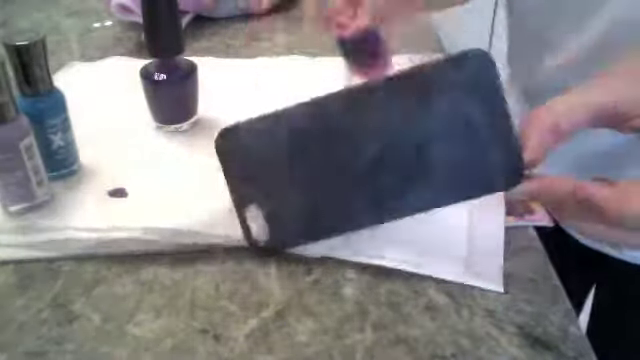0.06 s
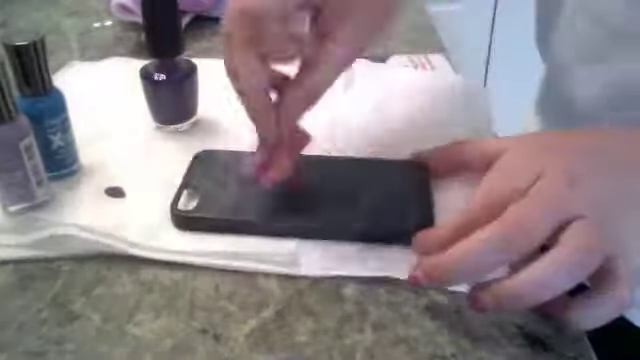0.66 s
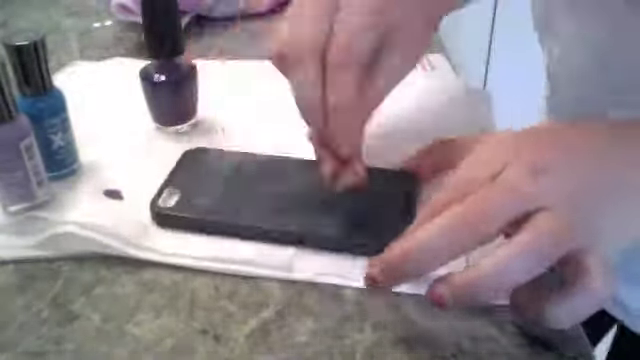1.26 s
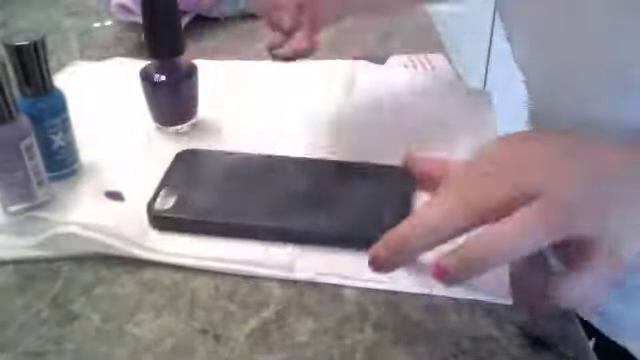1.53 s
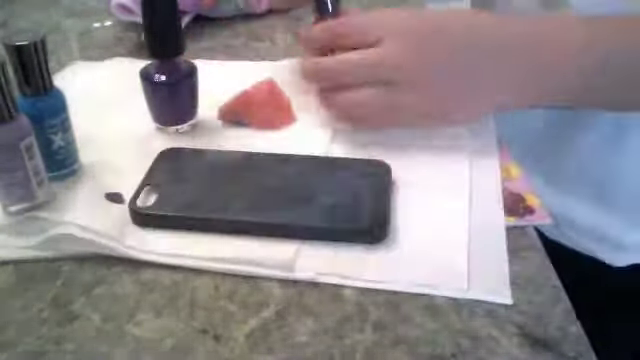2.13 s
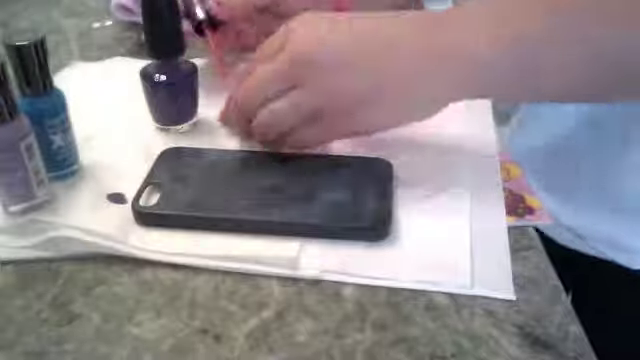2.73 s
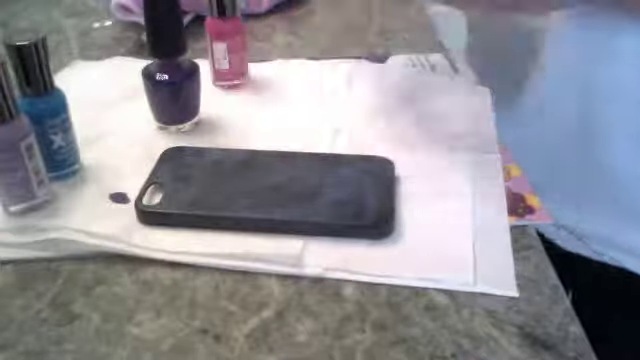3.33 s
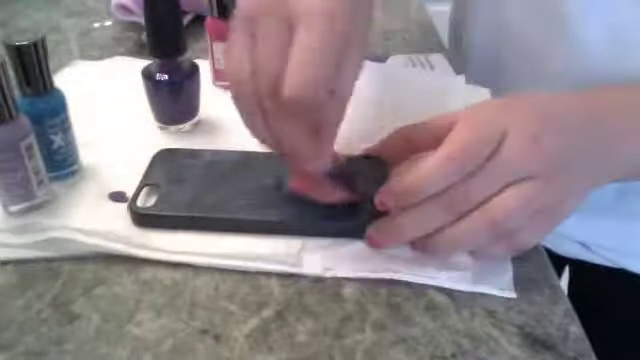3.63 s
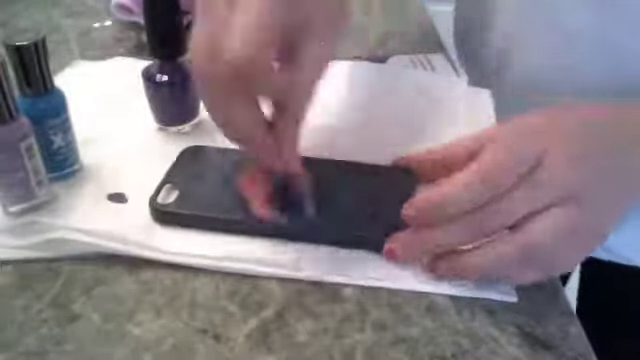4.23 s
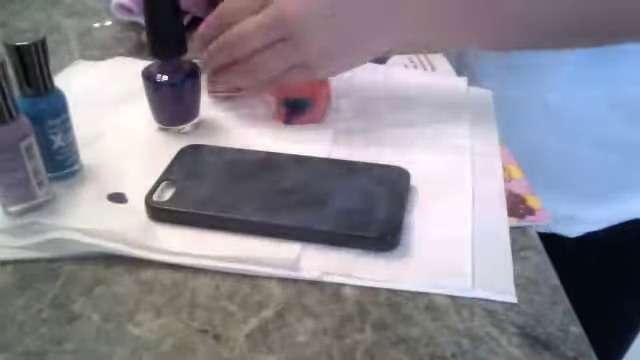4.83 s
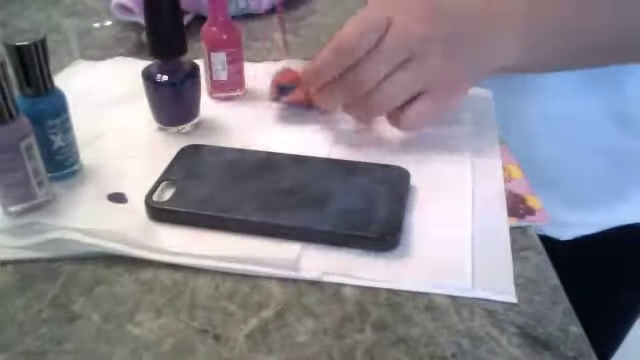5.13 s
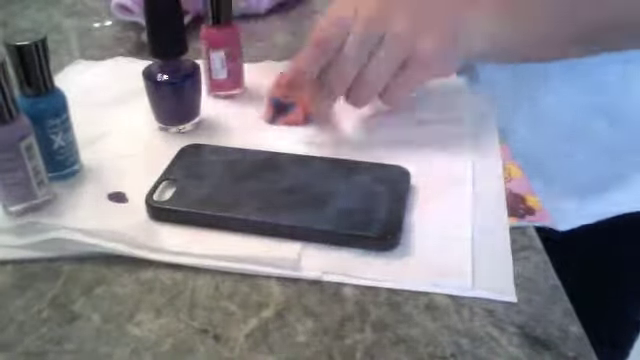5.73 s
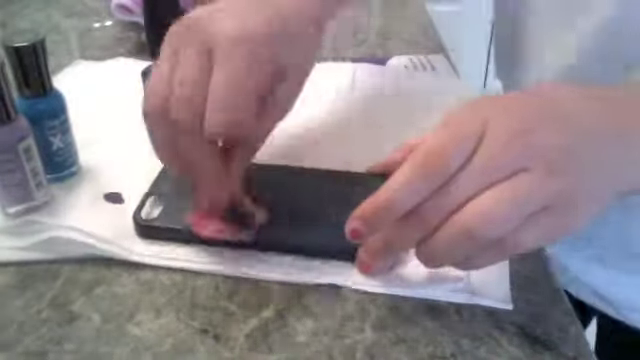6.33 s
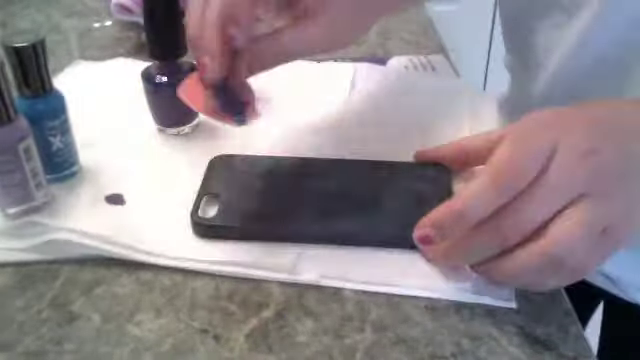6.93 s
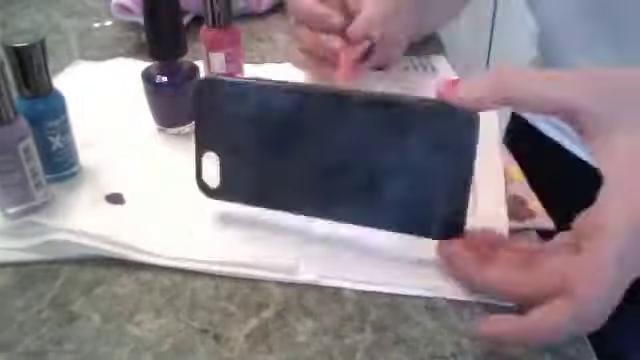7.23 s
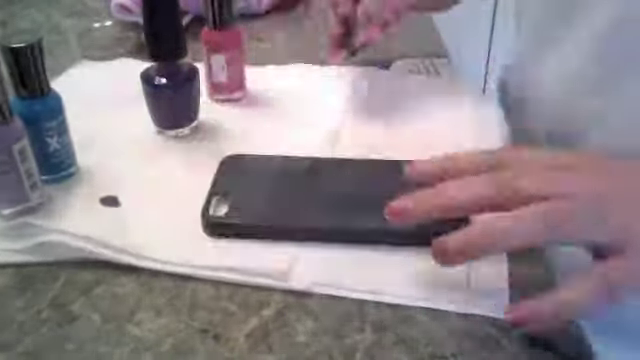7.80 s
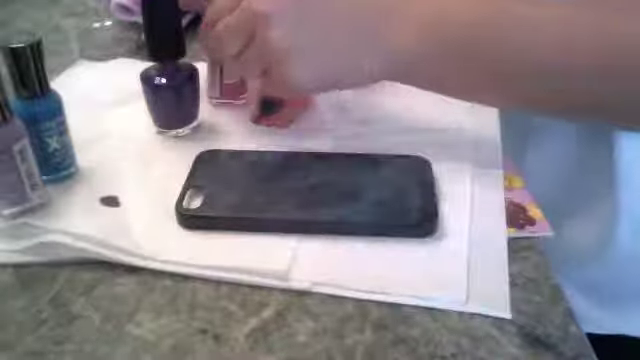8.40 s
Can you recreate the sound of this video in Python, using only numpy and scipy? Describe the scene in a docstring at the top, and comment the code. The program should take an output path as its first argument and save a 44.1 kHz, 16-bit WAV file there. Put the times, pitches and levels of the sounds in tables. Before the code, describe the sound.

A table top is heard from close up, on a small microphone with almost no bass and a hiss that swells and sinks throughout. From about 0.5 to 1.5 seconds a sponge dabs a plastic phone case, with faint tacky pops and light, sharp clicks. From 1.7 to 3 seconds the screw cap of a nail polish bottle is twisted, clicking and giving a run of short, high squeaks as it sticks and slips. Sparse pops, ticks and soft finger bumps follow, with a faint whir in the hiss from about 4 to 5.3 seconds. Near 6 seconds the dabs thicken and the case clicks more loudly as it is pressed and shifted. Its stiff rim takes a few knocks around 6.7 seconds, and the clicks go on until about 7. A few faint ticks and a soft bump come by 8.4 seconds.

```python
"""A table top from close up, on a small microphone with almost no bass and a hiss that swells and sinks.
A paint sponge is dabbed on a plastic phone case lying on paper: tacky pops and light clicks.
From 1.7 to 3 s the screw cap of a nail polish bottle is twisted; it clicks, and squeaks as its thread
sticks and slips. Sparse pops and ticks follow, with a faint whir in the hiss until 5.3 s. Near 6 s the
dabs thicken; the case clicks as it is pressed and shifted, and its stiff rim takes a few knocks."""
import sys
import numpy as np
from scipy import signal
from scipy.fft import rfft, irfft, next_fast_len
from scipy.io import wavfile
from scipy.ndimage import map_coordinates

SR = 44100
rng = np.random.default_rng(int(sys.argv[2]) if len(sys.argv) > 2 else 0)


def unload_wav(signal):
    """Save mono or channel-first audio to the path in sys.argv[1] as 16-bit WAV at rate SR, clipped to [-1, 1]."""
    wavfile.write(
        sys.argv[1],
        SR,
        np.round(np.clip(np.atleast_2d(signal).T, -1, 1) * 32767).astype(np.int16),
    )


N = 372997

# tacky contact, sponge on case or fingers on bottle: (start [s], end [s], level [dB], fizz pitch [Hz])
TACKY_SPELLS = [(0.509, .81, -58, 13000), (0.901, 1.38, -53.5, 12800), (2.275, 2.335, -53.5, 12500),
                (2.639, 2.66, -48.5, 14000), (3.599, 3.909, -62.5, 11930), (4.185, 4.36, -55, 11640),
                (5.901, 6.66, -55.5, 11900)]


def amp(db):
    """Decibels to gain."""
    return 10 ** (np.asarray(db) / 20)


def unit(x):
    """Scale to rms 1."""
    return x / np.sqrt(np.mean(x ** 2) + 1e-20)


def norm(x):
    """Scale to energy 1."""
    return x / np.sqrt(np.sum(x ** 2) + 1e-20)


def wobble(size, rate):
    """A smooth random curve, rate knots a second."""
    return map_coordinates(rng.standard_normal(int(size * rate / SR) + 4), [np.arange(size) * rate / SR])


def along(points, hz):
    """Interpolate (frequency [Hz], value) points on a log frequency axis."""
    freqs, values = np.transpose(points)
    return np.interp(np.log(hz + 1), np.log(freqs), values)


def colour(x, *spectra):
    """Causal filter whose gain is the sum of the spectra, each of (frequency [Hz], gain [dB]) points."""
    size = 2 * next_fast_len(len(x))
    hz = np.fft.rfftfreq(size, 1 / SR)
    gain = amp(sum(along(spectrum, hz) for spectrum in spectra))
    cepstrum = irfft(np.log(gain), size)
    cepstrum[1:size // 2] *= 2  # fold to minimum phase
    cepstrum[size // 2 + 1:] = 0
    return irfft(rfft(x, size) * np.exp(rfft(cepstrum)), size)[:len(x)]


def lowpass(x, hz):
    """A steep band limit."""
    return signal.sosfilt(signal.ellip(12, .1, 70, hz, fs=SR, output="sos"), x)


def add(track, start, x):
    """Mix x into the track at start [s]."""
    part = track[max(round(start * SR), 0):][:len(x)]
    part += x[:len(part)]


def dying_noise(t, t60):
    """White noise that falls 60 dB in t60 seconds."""
    return rng.standard_normal(len(t)) * amp(-60 * t / t60)


def room(x, t60, wet_db):
    """Short, weak reflections from things near the microphone."""
    t = np.arange(SR // 4) / SR
    tail = norm(dying_noise(t, t60) * (t > .002))
    return x + amp(wet_db) * signal.fftconvolve(x, tail)[:N]


def microphone_hiss(top_hz=15780, unrest_db=1.17, whir_db=-9, whir_width_hz=80):
    """The microphone's hiss swells and sinks; for a while a faint whir stands in it."""
    # course of the hiss: (time [s], level [dB])
    swells = [(0.0, -58.5), (0.14, -63), (0.2, -59.5), (0.48, -63), (0.53, -57.5), (0.9, -60.5),
              (1.0, -56.5), (1.5, -60), (2.64, -58), (2.81, -67), (3.0, -54), (3.2, -63.5), (3.37, -64),
              (3.67, -57), (3.9, -57), (4.1, -65), (4.3, -55), (4.49, -63.5), (4.66, -60), (5.3, -64),
              (5.39, -59.5), (5.7, -65), (5.75, -59.5), (5.88, -63), (5.96, -57.5), (7.12, -59.5),
              (7.47, -66), (7.62, -56.5), (7.87, -65), (8.16, -60.5), (8.29, -64), (8.34, -58)]
    # spectrum of the hiss: (frequency [Hz], gain [dB])
    noise_floor = [(100, -39.5), (400, -38), (550, -25), (750, -15), (1100, -3.5), (2000, 2), (4500, -3),
                   (5400, -1), (7200, 0.5), (8300, -3), (8950, -1), (9300, -8.5), (13000, -6.5),
                   (15700, -7)]
    # narrow bands of the whir: (frequency [Hz], relative level [dB])
    whir_bands = [(1800, 0.5), (1980, -1), (3020, -4.5), (990, -10)]
    t = np.arange(N) / SR
    level = amp(np.interp(t, *np.transpose(swells)) + unrest_db * wobble(N, 23))
    noise = room(rng.standard_normal(N), t60=0.038, wet_db=-10)  # near reflections ripple its spectrum
    noise = unit(lowpass(colour(noise, noise_floor), top_hz))
    whir = sum(amp(db) * wobble(N, whir_width_hz) * np.sin(2 * np.pi * hz * t) for hz, db in whir_bands)
    whir_fade = np.interp(t, [3.5, 4.4, 5.1, 5.3], [0, 1, 1, 0])
    return level * (noise + amp(whir_db) * whir_fade * unit(whir))


def clicks(contacts, modes, snap_t60, scatter_db, scatter_t60, firm_ring_db, gain_db):
    """Each contact is a sharp snap, then the plastic's modes and a scatter of echoes off the table."""
    # spectrum of a contact on plastic: (frequency [Hz], gain [dB])
    contact_spectrum = [(100, -48.5), (400, -44), (700, -24), (1000, -11.5), (1500, -3.5), (2500, 1.5),
                        (11000, 4), (13500, 2), (15800, -10.5), (17200, -44.5)]
    firm_db, cluster_hz = -30.5, 376  # level of a firm contact; spread of modes around a resonance
    out, t = np.zeros(N), np.arange(SR // 16) / SR
    for start, db, body_db, bright_db in contacts:
        # the harder the contact, the more of its energy lies at the very top
        hardness = [(2300, body_db + 8.5), (3800, 0.0025), (7500, 0.011),
                    (10500, min(bright_db, 6)), (14500, 1.17 * bright_db)]
        # light, thin ticks barely ring
        ring_db = firm_ring_db + 0.17 * (db - firm_db) - 0.13 * max(bright_db, 0)
        snap = norm(dying_noise(t, snap_t60))
        snap[0] += 1.3
        ring = np.zeros(len(t))
        for hz, mode_db, t60 in modes:
            # each resonance is a cluster of close modes that beat, so the ring stays dry
            beating = wobble(len(t), cluster_hz) + 1j * wobble(len(t), cluster_hz)
            ring += amp(mode_db - 60 * t / t60) * (beating * np.exp(2j * np.pi * hz * t)).real
        scatter = amp(scatter_db) * norm(dying_noise(t, scatter_t60))
        tail = (norm(ring) + scatter) * (1 - np.exp(-t / 0.0004))
        click = norm(colour(snap, contact_spectrum, hardness))
        click += amp(ring_db) * norm(colour(tail, contact_spectrum, hardness))
        add(out, start, amp(db + gain_db) * np.sqrt(SR / 100) * norm(click))  # level over 10 ms
    return out


def plastic_clicks(ticks_per_s=4, tick_body_db=-5, tick_bright_db=-2):
    """Light plastic clicks from the case and the bottle cap, and faint random ticks under the dabs."""
    # light plastic contacts: (time [s], level [dB], hollow body [dB], brightness [dB])
    taps = [(0.1659, -51.5, 3.5, -3), (0.6104, -47, -9, 0), (0.6318, -42.5, -10.5, -15),
            (0.7865, -39, -7, 5), (0.9723, -41, -1, -9), (1.0568, -38.5, -3, -11),
            (1.0832, -29.5, -2.5, 3.5), (1.1054, -27, -5.5, 6), (1.1871, -26, -5, 3),
            (1.2093, -28.5, -9, 5.5), (1.2843, -35.5, -3.5, 1.5), (1.4094, -40, -7.5, -14),
            (1.4334, -42, -7, -5), (1.4532, -39.5, -4, -5), (1.4584, -33.5, -6, 2.5),
            (1.4754, -38, -1, 2.5), (1.8736, -57.5, -12, 12), (1.9399, -30.5, -40, 9.5),
            (1.9548, -31.5, -20.5, -3), (2.3895, -52, -9, 10), (2.3985, -45, -28, 14),
            (2.4053, -49.5, -15, 11), (2.576, -43, -18, 9), (2.9214, -42, -43, 5), (3.0431, -44, -5.5, -25),
            (3.7218, -50, -11, 5), (4.2507, -47.5, -4, 8), (4.3349, -38.5, -8, -4), (4.6173, -45, 2, 32.5),
            (4.9147, -52.5, -26, -5), (5.3683, -56.5, -13.5, 1), (5.9412, -44, -11, 6),
            (6.1473, -47.5, -11, -10), (6.1626, -42, -12, -4), (6.1672, -25, -15.5, 4.5),
            (6.1876, -26.5, -16.5, -0.5), (6.2951, -34.5, -12, -1.5), (6.3136, -27.5, -18.5, 1),
            (6.4393, -32, -15, 1), (6.5521, -30, -13.5, -1.5), (6.5724, -45, -7, -6),
            (6.8426, -32.5, -10.5, -2), (6.8629, -46, -1, -1), (6.8786, -37.5, -9, -4),
            (6.8963, -28, -14, -1), (6.9205, -50, -2, 1), (6.9485, -36.5, -17, -13),
            (7.0083, -28, -17.5, 0.5), (7.0566, -31.5, -16.5, -1), (7.6665, -43, -15, 5),
            (8.1697, -45, -18, 24), (8.309, -43.5, 2, 23)]
    # modes of the plastic: (frequency [Hz], relative level [dB], t60 [s])
    plastic_modes = [(2130, -1.5, 0.038), (3678, -2.5, 0.036), (4340, -4, .04), (7210, -5, 0.03),
                     (7650, 2.5, 0.038), (8960, 2.5, .035), (10300, 0, .032), (10900, -2.5, 0.035)]
    ticks = []
    for start, end, db, _ in TACKY_SPELLS:
        span = end - start
        for late, force in rng.random((12, 2))[:round(ticks_per_s * span)]:
            ticks.append((start + late * span, db + 2 * force - 1, tick_body_db, tick_bright_db))
    return clicks(taps + ticks, plastic_modes, snap_t60=0.0023, scatter_db=1, scatter_t60=0.041,
                  firm_ring_db=-2.5, gain_db=-0.5)


def finger_bumps(width_s=0.00052, rattle_db=-15, rattle_t60=0.04, gain_db=2):
    """A fingertip gives a dull knock of two or three cycles, then a faint rattle."""
    # soft finger bumps: (time [s], level [dB], pitch [Hz])
    bumps = [(0.342, -34, 2080), (3.65, -38.5, 2280), (5.224, -42.5, 1797), (8.363, -38.5, 1310)]
    out, t = np.zeros(N), np.arange(SR // 20) / SR
    for start, db, hz in bumps:
        knock = np.sin(2 * np.pi * hz * t) * np.exp(-((t - .0015) / width_s) ** 2)
        spectrum = [(0.217 * hz, -36), (0.65 * hz, -5), (0.64 * hz, 0), (5.4 * hz, -20)]
        rattle = unit(colour(rng.standard_normal(len(t)), spectrum))
        rattle *= amp(rattle_db - 60 * t / rattle_t60)
        add(out, start, amp(db + gain_db) * (knock + rattle))
    return out


def fizzy_pop(db, hz, rise_s=0.0014, tick_db=-11):
    """A tacky surface lets go with a short high fizz and a soft tick."""
    t = np.arange(SR // 40) / SR
    burst = t / rise_s * np.exp(-t / rise_s)
    fizz_spectrum = [(400, -60), (1000, -40), (0.76 * hz, -21), (0.75 * hz, -7),
                     (hz, 0), (1.28 * hz, -8), (1.1 * hz, -22)]
    tick_spectrum = [(400, -36.5), (1500, -5), (3000, -6), (7000, -11.5), (16000, -28)]
    fizz = colour(burst * rng.standard_normal(len(t)), fizz_spectrum)
    tick = colour(burst * rng.standard_normal(len(t)), tick_spectrum)
    return amp(db) * np.sqrt(SR / 200) * (norm(fizz) + amp(tick_db) * norm(tick))  # level over 5 ms


def tacky_pops(clear_hz=12600, pops_per_s=55, spread_db=4.5, pitch_spread=0.043):
    """A few clear pops, and many faint ones of random size while a tacky surface is worked."""
    # sponge or fingers letting go of a surface: (time [s], level [dB])
    clear_pops = [(0.518, -45), (0.54, -47.5), (0.684, -52), (0.703, -44.5), (0.73, -48), (0.774, -50),
                  (0.794, -45.5), (0.98, -47), (1.269, -46), (2.64, -46), (3.014, -45), (3.834, -50),
                  (4.295, -42.5), (5.923, -45), (5.982, -50), (6.107, -47.5), (6.263, -46), (6.342, -48)]
    out = np.zeros(N)
    for start, db in clear_pops:
        add(out, start, fizzy_pop(db, clear_hz * np.exp(pitch_spread * rng.standard_normal())))
    for start, end, db, hz in TACKY_SPELLS:
        for moment in np.arange(start, end, 1 / pops_per_s):
            late, pitch, strength = rng.standard_normal(3)
            pop = fizzy_pop(db + spread_db * strength, hz * np.exp(pitch_spread * pitch))
            add(out, moment + .005 * late, pop)
    return out


def cap_squeaks(cap_q=4.9, bloom_s=0.0045, edge_s=0.0025, rasp_db=-8.5, scrape_db=-2):
    """The cap's thread sticks and slips about 1750 times a second; an uneven grip adds a scrape."""
    # slips of the thread: (start [s], end [s], pitch [Hz], glide [Hz], level [dB],
    # resonance of the gripped cap [Hz], upper partials [dB], roughness [0-1])
    slips = [(1.709, 1.723, 1800, -32, -31.5, 3900, 5.5, 0.38),
             (1.719, 1.73, 1735, -170, -24, 4450, -13, 0.11),
             (1.732, 1.753, 1725, 140, -36.5, 4540, 0, 0.58),
             (1.938, 1.948, 2210, -2, -25.5, 4630, 1, 0.39),
             (1.949, 1.989, 1952, -130, -30.5, 5550, -15, 0.26),
             (1.98, 2.008, 1868, -60, -33, 4730, -9.5, 0.42),
             (2.0209, 2.052, 1794, -18, -31, 2576, -9.5, 0.18),
             (2.095, 2.119, 1714, -190, -32.5, 2770, 0, 0.18),
             (2.135, 2.146, 1683, -80, -36, 3060, -27, 0.28),
             (2.175, 2.192, 1642, -1, -32.5, 3770, -16, 0.16),
             (2.191, 2.213, 1726, 48, -36.5, 3280, -39, 0.57),
             (2.215, 2.226, 1716, 70, -32.5, 3700, -28, 0.5),
             (2.234, 2.263, 1721, -22, -27, 3500, -14, 0.08),
             (2.27, 2.288, 1610, -28, -32, 4000, -32, 0.22), (2.296, 2.302, 1650, -34, -35, 3800, -19, .2),
             (2.311, 2.332, 1675, 103, -31.5, 4304, -22, 0.13),
             (2.363, 2.376, 1774, 50, -43, 2070, -29, 0.3),
             (2.532, 2.539, 2050, -200, -47.5, 3220, -26, .4),
             (2.548, 2.563, 1686, -88, -32, 2600, -5, 0.31), (2.59, 2.615, 1668, -22, -28, 2450, -14, .09),
             (2.983, 3.012, 1729, -110, -34, 4250, -12, 0.23)]
    # spectrum of the scraping thread: (frequency [Hz], gain [dB])
    scrape_spectrum = [(100, -70), (450, -57), (1000, -13), (1700, -2), (2500, 0), (3700, 7.5), (5200, 6),
                       (8000, -10.5), (11000, -2.5), (16000, -17.5)]
    # the small cap radiates little bass: (frequency [Hz], gain [dB])
    radiation = [(80, -9), (250, -16), (450, -16.5), (800, 1), (1200, 0)]
    puff_spectrum = [(700, -52.5), (3000, -22.5), (7500, 5), (12000, -5), (15500, -4), (17200, -37)]
    end_lift, drift, jitter = 0.025, 0.026, 0.081  # shares of the pitch
    fade_db, arch_db, flutter_db, sway_db = -2.5, 4, 8, 6
    out = np.zeros(N)
    for start, end, hz, glide_hz, db, cap_hz, upper_db, rough in slips:
        length = max(end - start, edge_s) + edge_s
        size = int(length * SR)
        t = np.arange(size) / SR
        stroke = 2 * t / length - 1  # runs from -1 to 1 through the slip
        unrest = np.sqrt(rough)
        pitch = hz * (1 + end_lift * stroke ** 2) + glide_hz * stroke / 2
        pitch *= 1 + drift * unrest * wobble(size, 259) + jitter * rough * wobble(size, 1500)
        # each cycle comes a little early or late, which blurs the high partials
        phase = 2 * np.pi * np.cumsum(pitch) / SR + 0.07 * unrest * wobble(size, 2990)
        # the cap lifts the partial nearest its resonance
        ratio = np.arange(1, 4) * hz / cap_hz
        lower = norm(1 / np.hypot(1 - ratio ** 2, ratio / cap_q))
        partials = np.r_[lower, amp(upper_db) * norm(amp([1.5, -5.5, -20, -18]))]
        bloom = 1 - np.exp(-t / bloom_s)  # the upper partials take time to build
        tone = np.zeros(size)
        for k, strength in enumerate(partials, 1):
            sway = amp(sway_db * unrest * wobble(size, 152))
            fray = (k / len(partials)) ** 2 * wobble(size, 700)  # top partials lose their lock and rasp
            wave = np.sin(k * phase + fray + 2 * np.pi * rng.random())
            tone += strength * unit(sway * bloom ** ((k - 1) / 2) * wave)
        # a puff of fine friction noise rides on every cycle
        puffs = colour(rng.standard_normal(size) * (1 + np.cos(phase)), puff_spectrum)
        tone += amp(upper_db + rasp_db) * unit(puffs * bloom * amp(7 * wobble(size, 190)))
        treble_tilt = [(4000, 0), (9000, .5 * upper_db + 3)]
        scrape = unit(colour(rng.standard_normal(size), scrape_spectrum, treble_tilt))
        ramps = np.clip(2 * t / edge_s, 0, 1) * np.clip((length - t) / (2 * edge_s), 0, 1)
        grip = np.sin(np.pi / 2 * ramps) ** 2
        # each slip loses force as it runs
        force_db = fade_db * stroke - arch_db * stroke ** 2 + flutter_db * rough * wobble(size, 332)
        slip = (unit(tone) + amp(scrape_db) * rough * scrape) * grip * amp(force_db)
        add(out, start - edge_s / 8, amp(db) * unit(slip))
    return colour(out, radiation)


def rim_knocks():
    """Knocks on the stiff rim of the case, with a longer snap and more ring than the light clicks."""
    # contacts on the rim: (time [s], level [dB], hollow body [dB], brightness [dB])
    knocks = [(6.6713, -42.5, -2, -22), (6.6923, -42.5, 0, -5), (6.716, -25, -11, 0.5),
              (6.7367, -24.5, -12.5, -1.5), (7.0897, -48.5, -7, -14), (7.1214, -53.5, -7, -7)]
    # modes of the rim: (frequency [Hz], relative level [dB], t60 [s])
    rim_modes = [(2190, -7.5, 0.033), (3890, -7.5, 0.029), (4300, -7, 0.043), (6380, 9, 0.013),
                 (6840, -1, 0.043), (7630, -8, 0.02), (9280, -5.5, 0.039), (12400, -6, 0.04),
                 (13500, -3, 0.033)]
    return clicks(knocks, rim_modes, snap_t60=0.0061, scatter_db=-10, scatter_t60=0.052,
                  firm_ring_db=3, gain_db=0.5)


def scene():
    """Case, sponge and cap on the table, close to one microphone, over its hiss."""
    handling = plastic_clicks() + rim_knocks() + finger_bumps() + tacky_pops()
    handling = room(handling, t60=0.21, wet_db=-22.5)
    cap = room(cap_squeaks(), t60=0.07, wet_db=-9)
    return (handling + cap + microphone_hiss())[None]


def record(dry):
    """The small microphone cuts off the very top of the treble."""
    return lowpass(dry, hz=16600)


dry = scene()
out = record(dry)
unload_wav(out)
```